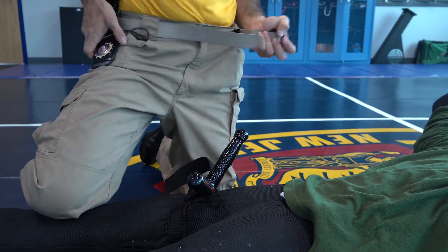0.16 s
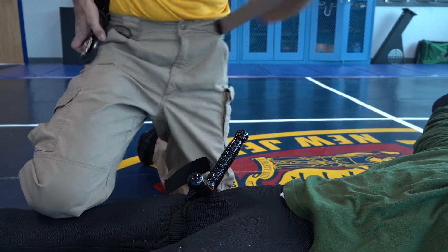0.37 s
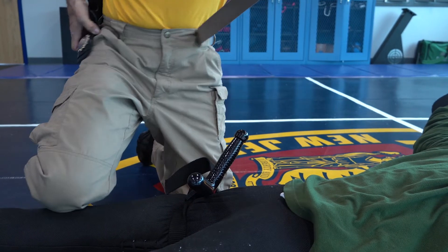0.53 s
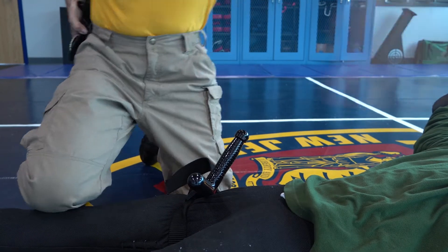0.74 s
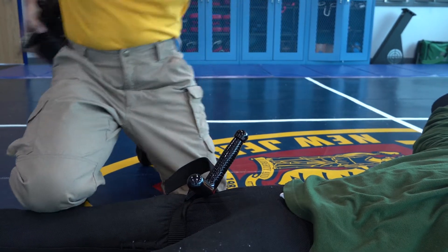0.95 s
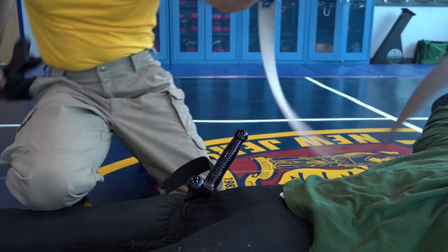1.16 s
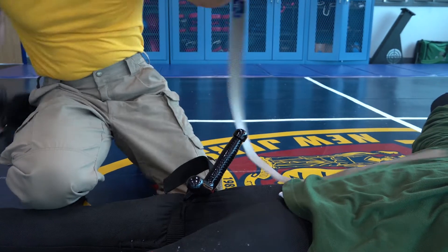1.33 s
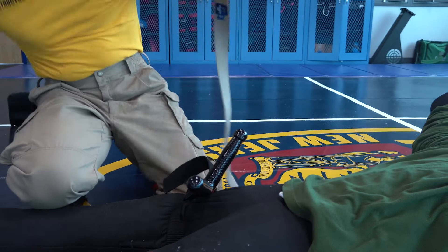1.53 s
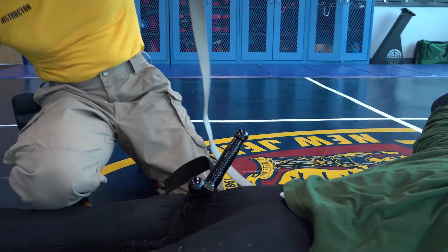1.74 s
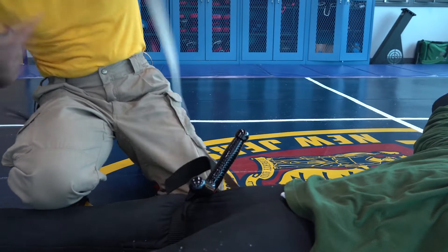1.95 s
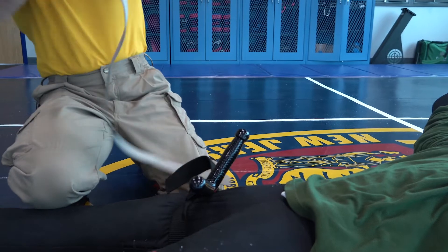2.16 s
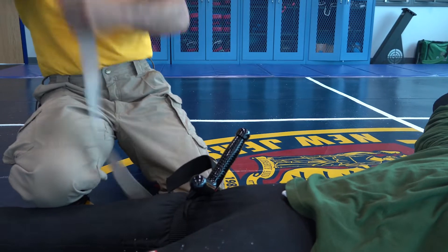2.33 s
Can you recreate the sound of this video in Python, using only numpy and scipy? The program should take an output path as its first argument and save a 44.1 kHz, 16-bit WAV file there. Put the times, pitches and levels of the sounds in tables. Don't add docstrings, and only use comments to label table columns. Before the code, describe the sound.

A webbing belt is pulled fast through trouser loops, a buzzing rising zip ending in a snap, then knee thumps, buckle clatter, a short gritty skid and late clicks, close-miked in a large reverberant hall.

```python
import sys
import numpy as np
from scipy import signal
from scipy.io import wavfile

SR = 44100
rng = np.random.default_rng(int(sys.argv[2]) if len(sys.argv) > 2 else 0)


def amplitude_ratio(level_db):
    exponent = np.asarray(level_db, float) / 20
    return 10 ** exponent


def put_to_file(sound):
    columns = np.atleast_2d(sound).T
    safe = np.clip(columns, -1, 1)
    whole_steps = np.round(safe * 32767)
    wavfile.write(sys.argv[1], SR, whole_steps.astype(np.int16))


N = 105840
GRAINS_PER_S = 1100


def rms_one(x):
    return x / np.sqrt(np.mean(x ** 2) + 1e-20)


def peak_one(x):
    return x / np.max(np.abs(x))


def in_time(rows):
    s, *columns = np.transpose(rows)
    return [np.interp(np.arange(N) / SR, s, column) for column in columns]


def drift(rate_hz):
    r = np.exp(-2 * np.pi * rate_hz / SR)
    wander = signal.lfilter([1], [1, -2 * r, r * r], rng.standard_normal(N + SR))
    return rms_one(wander[SR:])


def ring(x, hz, t60):
    r, w = amplitude_ratio(-60 / (t60 * SR)), 2 * np.pi * hz / SR
    return signal.lfilter([0, np.sin(w)], [1, -2 * r * np.cos(w), r * r], x + 1e-18)


def butter(x, order, hz, kind):
    return signal.sosfilt(signal.butter(order, hz, kind, fs=SR, output="sos"), x)


def colour(x, spectrum, patchy_db):
    out, edges = 0, 20 * 2 ** np.arange(0, 10.1, .5)
    hz, db = np.transpose(spectrum)
    for k, (low, high) in enumerate(zip(edges, edges[1:])):
        band = butter(x[k % 2], 2, [low, high], "band")
        band_db = np.interp(np.log(low * high) / 2, np.log(hz), db)
        out = out + band * amplitude_ratio(band_db + patchy_db * drift(21.0))
    return rms_one(out)


def add(out, s, x):
    i = int(s * SR)
    out[i:i + len(x)] += x[:len(out) - i]


def air():
    # frequency in Hz, level in dB per Hz.
    air_tone = [(24, -22), (45, 10), (68, 0.5), (95, -9.5), (221, -14), (627, -19), (1000, -21),
                (4030, -35.5), (12300, -44), (15000, -65)]
    hum = butter(colour(rng.standard_normal((2, N)), air_tone, patchy_db=3.0), 4, 24.5, "high")
    wobble = butter(rng.standard_normal(N + SR), 3, [5, 10.96], "band")[SR:]
    return amplitude_ratio(-40.5) * hum + amplitude_ratio(-36) * rms_one(wobble)


def hall(x):
    t60, early_db, early_t60, wall_cut_hz = 1.38, 15, 0.15, 2700
    t = np.arange(int(1.5 * SR)) / SR
    noise = rng.standard_normal(len(t))
    low = butter(noise, 1, wall_cut_hz, "low")
    echoes = low + (noise - low) * amplitude_ratio(-40 * t / t60)
    decay = amplitude_ratio(-60 * t / t60) + amplitude_ratio(early_db - 60 * t / early_t60)
    gap = np.clip((t - .008) / 0.015, 0, 1)
    tail = butter(echoes * decay * gap, 2, 250, "high")
    return signal.fftconvolve(x, tail / np.sqrt(np.sum(tail ** 2)))[:N]


def cloth():
    # time in seconds, level in dB.
    movement = [(0, -41), (.06, -50), (.12, -56), (.6, -37.5), (.68, -44.5), (.78, -44.5), (.85, -49.5),
                (1.12, -52), (1.3, -49), (1.36, -46), (1.42, -49.5), (1.47, -42.5), (1.56, -47.5),
                (1.97, -48.5), (2.062, -63), (2.085, -44), (2.31, -45.5), (2.37, -39.5)]
    # frequency in Hz, level in dB per Hz.
    cloth_tone = [(180, 6.5), (300, -16), (431, -48), (620, -20), (720, -74), (1120, 0), (7500, -13),
                  (10600, -10), (15500, -21.5)]
    catches = rng.random((2, N)) < GRAINS_PER_S / SR
    grains = catches * amplitude_ratio(1.9 * rng.exponential(1, (2, N))) * rng.choice([-1, 1], (2, N))
    source = rms_one(grains) + rng.standard_normal((2, N))
    level_db, = in_time(movement)
    return amplitude_ratio(level_db + 2.5 + 1.4 * drift(25.0)) * colour(source, cloth_tone, patchy_db=0.7)


def rustle():
    start_s, rise_s, level_db = 2.32, 0.036, -44
    noise, t = rng.standard_normal(N), np.arange(N) / SR - start_s
    bands = rms_one(ring(noise, 3780, 0.005)) + amplitude_ratio(-7.0) * rms_one(ring(noise, 2600, .003))
    return amplitude_ratio(level_db + 2.7 * drift(30.0)) * np.clip(t / rise_s, 0, 1) * bands


def thumps():
    # start in seconds, peak in dB, floor pitch in Hz.
    landings = [(.002, -29.5, 270), (0.042, -26, 210), (1.123, -28, 219), (1.25, -34, 300),
                (1.317, -16, 166), (1.438, -30.5, 177), (1.584, -24, 208.6), (1.625, -47, 178),
                (1.767, -33.5, 221), (2.339, -21.5, 236.5)]
    out, t, t60 = np.zeros(N), np.arange(SR // 8) / SR, 0.052
    for s, db, hz in landings:
        blow = rng.standard_normal(len(t)) * np.exp(-t / 0.0048)
        add(out, s, amplitude_ratio(db) * peak_one(ring(ring(blow, hz, t60), hz, t60 / 4)))
    return out


def scuffs():
    # start in seconds, peak in dB, length in seconds, ring in Hz.
    rubs = [(.001, -19.5, 0.002, 660), (.009, -20.5, 0.014, 1750), (0.025, -25.5, 0.0076, 1730),
            (.045, -21.5, 0.0061, 1810), (0.144, -26.5, 0.0065, 3100), (0.5595, -19, 0.006, 850),
            (1.054, -33, 0.0075, 1650), (1.082, -29, 0.0099, 1580), (1.12, -26, 0.0099, 1970),
            (1.13, -24, 0.004, 1500), (1.249, -30, 0.016, 1240), (1.315, -20, 0.017, 1200),
            (1.321, -16, .011, 1700), (1.354, -31, 0.0071, 2870), (1.433, -25.5, 0.017, 2370),
            (1.474, -34, 0.013, 2200), (1.58, -20, 0.0038, 540), (1.585, -19.5, 0.011, 1100),
            (1.622, -17.5, 0.0049, 930), (2.16, -25, 0.0032, 2750), (2.17, -30.5, 0.016, 1260)]
    dull_db, edge_db = 1.5, -0.5
    out, t = np.zeros(N), np.arange(SR // 8) / SR
    for s, db, length, hz in rubs:
        rub = rng.standard_normal(len(t)) * np.minimum(t / 0.0013, 1) * np.exp(-(t / length) ** 2)
        body = peak_one(ring(rub, hz, 0.0015)) + amplitude_ratio(dull_db) * peak_one(ring(rub, 685, 0.0035))
        edge = np.diff(signal.lfilter([1], [1, -1.6, .66], rub), prepend=0)
        add(out, s, amplitude_ratio(db) * peak_one(body + amplitude_ratio(edge_db) * peak_one(edge)))
    return out


def creak():
    # time of the slip in seconds, level in dB.
    slips = [(0.709, -25.5), (0.717, -23), (0.729, -22.5), (0.739, -23), (0.749, -22.5), (0.76, -22.5),
             (0.776, -24)]
    # mode in Hz, level in dB, t60 in seconds.
    boot = [(203.1, -5, 0.15), (323, -3, 0.031), (564.5, -6, 0.034), (1000, -6.5, 0.013), (1606, -7, 0.037),
            (2440, -13.5, 0.037), (3470, -14, 0.021)]
    out, t = np.zeros(N), np.arange(SR // 20) / SR
    for hz, mode_db, t60 in boot:
        train = np.zeros(N)
        for s, db in slips:
            train[int(s * SR)] = amplitude_ratio(db + mode_db + rng.normal(0, 1))
        out = ring(train, hz, t60) - out
    puff_db, puff_t60 = 5, 0.018
    for s, db in slips:
        hiss = ring(rng.standard_normal(len(t)), 3000, 0.00037) / 3
        add(out, s, amplitude_ratio(db + puff_db - 60 * t / puff_t60) * hiss)
    return out


def skid():
    # frequency in Hz, level in dB per Hz.
    skid_tone = [(180, 5), (300, 8.5), (490, -16), (943, 7), (3790, -3.5), (5800, 4.5), (9800, -1),
                 (15000, -42)]
    start_s, hold_s, t60, level_db, grit_share = 1.579, .055, 0.46, -28, 0.95
    t = np.arange(N) / SR - start_s
    shape = np.clip(t / .006, 0, 1) * amplitude_ratio(-60 * np.clip(t - hold_s, 0, None) / t60)
    grit = (rng.random((2, N)) < GRAINS_PER_S / SR) * rng.standard_normal((2, N))
    source = rng.standard_normal((2, N)) + grit_share * rms_one(grit)
    return amplitude_ratio(level_db) * shape * colour(source, skid_tone, patchy_db=.8)


def clicks(table):
    ring_t60, crack_t60, upper_db = .008, .004, 2
    out, t = np.zeros(N), np.arange(SR // 20) / SR
    for s, db, low_hz, high_hz, crack_db in table:
        touch = rng.standard_normal(len(t)) * amplitude_ratio(-60 * t / crack_t60)
        lower = peak_one(ring(touch, low_hz, ring_t60))
        upper = peak_one(ring(touch, high_hz, ring_t60 / 2))
        body = signal.lfilter([1, -1], [1, -.96], lower + amplitude_ratio(upper_db) * upper)
        crack = ring(touch, 9430, 0.0013) + 0.5 * ring(touch, 6060, 0.003)
        crack = crack + 0.04 * np.diff(touch, prepend=0)
        add(out, s, amplitude_ratio(db) * peak_one(body) + amplitude_ratio(crack_db) * peak_one(crack))
    return out


def snaps():
    # start in seconds, peak in dB, ring in Hz, t60 in
    # seconds, edge in Hz.
    releases = [(.3383, -1, 560, .011, 15000), (.5605, -17, 1780, .03, 4000), (.5625, -16, 830, .05, 2500),
                (.561, -24, 2650, .025, 6000), (.5925, -18, 720, .025, 2500), (2.1363, -4, 1450, .012, 6000),
                (2.1363, -9, 2500, .006, 8000),
                (0.4331, -6.5, 1130, 0.0087, 2500), (1.252, -32, 390, 0.045, 900),
              (1.322, -22.5, 390, 0.057, 890), (1.5807, -22.5, 113, 0.076, 1480),
              (1.6228, -13.5, 910, 0.016, 3000), (1.6286, -14, 1150, 0.0059, 4000),
              (2.1329, -6, 1760, 0.0028, 6000), (2.1329, -34, 3890, .006, 9100),
              (2.139, -18.5, 560, 0.013, 2000), (2.171, -30, 1270, 0.02, 2520)]
    out, t = np.zeros(N), np.arange(SR // 8) / SR
    for s, db, hz, t60, edge_hz in releases:
        swing = -np.cos(2 * np.pi * hz * t) * amplitude_ratio(-60 * t / t60)
        swing = butter(swing, 2, [hz / 3, min(edge_hz, SR / 3)], "band")
        add(out, s, amplitude_ratio(db) * peak_one(swing))
    return out


def ribs(stroke):
    # time in seconds, overtone gain in dB.
    press = [(.2, -3), (.235, 1.5), (.255, 3), (.27, 4), (.295, 0), (.31, 12), (.322, 5.5), (.337, -9.5),
             (.352, 9.5), (.37, -3), (.39, -3.5), (.41, 1.5), (.44, 6), (.458, 8), (.49, 7), (.512, 0),
             (.54, -7), (.562, -3)]
    # frequency in Hz, level in dB.
    radiation = [(300, -35), (450, -1), (650, 4), (850, -11), (1300, -0.5), (2100, -15.5), (3400, -16.5),
                 (5000, -30), (8000, -40)]
    jitter, scatter, flutter_db, fade_s = .008, .28, 1.0, .007
    (hz, db), (press_db,) = in_time(stroke), in_time(press)
    t, (body_hz, body_db) = np.arange(N) / SR, np.transpose(radiation)
    gate = np.clip(np.minimum(t - stroke[0][0], stroke[-1][0] - t) / fade_s, 0, 1)
    out = 0
    for ratio, loop_db in ((1, 0), (1.2, -11)):
        rib_hz = hz * ratio
        turn = 2 * np.pi * np.cumsum(rib_hz * (1 + jitter * drift(56.4))) / SR
        turn = turn + scatter / 4 * drift(220.0)
        for k in range(1, 8):
            tone_db = np.interp(np.log(k * rib_hz), np.log(body_hz), body_db) + (k > 1) * press_db
            level = amplitude_ratio(loop_db + tone_db + flutter_db * min(k, 3) * drift(40.0))
            out = out + level * np.sin(k * turn + scatter * min(k, 3) * drift(67.0))
    return gate * amplitude_ratio(db - 1) * out, gate * amplitude_ratio(db)


def belt():
    # time in seconds, ribs per second in Hz, level in dB.
    lead = [(.172, 897, -42.5), (.22, 1052, -18.5), (.245, 1373, -43), (.28, 1870, -59)]
    pull = [(0.226, 384.3, -11.5), (0.24, 432.6, -20.5), (0.252, 503.3, -14), (0.262, 567.3, -16.5),
            (0.274, 597, -12), (0.284, 673, -17.5), (0.294, 678, -15), (0.31, 582, -18.5),
            (0.316, 590, -18)]
    jerk = [(0.311, 738.7, -14), (0.321, 779, -14), (0.339, 643, -14), (0.349, 712, -15),
            (0.371, 730, -14.5), (0.388, 620.6, -11.5), (0.411, 820, -17), (0.43, 735, -20),
            (0.448, 830, -18)]
    tail_end = [(0.442, 942, -13), (0.454, 1034, -21.5), (0.476, 1099, -22), (0.488, 994.5, -29),
                (0.496, 1001, -23.5), (0.522, 893, -22), (0.572, 904, -26.5), (0.596, 812, -28),
                (0.6, 814.1, -46)]
    # frequency in Hz, level in dB per Hz.
    swish = [(240, -21.5), (400, -52), (663, -2.5), (928, -16.5), (1400, -18), (1790, -13), (7320, -26.5),
             (9790, -26), (15500, -38)]
    buzz, rub = np.sum([ribs(stroke) for stroke in (lead, pull, jerk, tail_end)], axis=0)
    keep = np.exp(-1 / (.02 * SR))
    rub = (rub + signal.lfilter([1 - keep], [1, -keep], rub)) / 2
    return buzz + amplitude_ratio(-8) * rub * colour(rng.standard_normal((2, N)), swish, patchy_db=2.5)


def scene():
    # start in seconds, ring in dB, lower and upper ring in Hz, crack in dB.
    buckle = [(.147, -22.5, 1220, 2160, -29), (.3377, -14, 2000, 3200, -6), (.433, -30, 1130, 1400, -42),
              (.592, -20, 754.5, 1614, -17.5), (1.194, -29.5, 1540, 3220, -37),
              (1.561, -25, 1640, 680, -52), (1.5765, -19.5, 880, 3930, -8.5), (1.5845, -15, 710, 2580, -6),
              (1.586, -12.5, 1200, 3970, -4), (1.6095, -41, 1220, 3500, -10),
              (1.6125, -35, 1200, 3500, -21), (1.6265, -14.5, 1470, 3860, -8),
              (2.077, -19, 1090, 2530, -51), (2.112, -22, 2240, 3300, -52), (2.1322, -13, 3800, 1960, -22),
              (2.1358, -28, 3400, 5660, -22.5), (2.15, -16.5, 1250, 3300, -34),
              (2.279, -20.5, 3230, 1650, -29)]
    ticks = [(.5605, -17, 1833, 2550, -41), (.567, -25, 850, 2660, -29), (1.5955, -42, 5500, 3000, -22),
             (1.601, -33, 5600, 2010, -28), (1.6175, -16, 5450, 7500, -32), (1.6235, -18, 2500, 5000, -20),
             (1.638, -23, 2970, 4020, -27), (1.651, -34, 1000, 7000, -22), (1.667, -21, 1960, 1210, -39),
             (1.765, -26.5, 2600, 4520, -36), (2.147, -20, 1230, 4650, -50), (2.1615, -27, 1500, 2700, -40),
             (2.25, -32, 1500, 2980, -29), (.565, -25, 2660, 1820, -36), (.571, -24, 900, 2690, -49)]
    hits = clicks(buckle) + scuffs() + thumps() + creak() + snaps()
    near = belt() + skid()
    walls = amplitude_ratio(-22) * hall(near + amplitude_ratio(10.0) * hits)
    return (near + hits + cloth() + walls + air() + clicks(ticks) + rustle())[None]


def low_pass(x):
    return signal.sosfilt(signal.butter(12, 15760, fs=SR, output="sos"), x)


def record(dry):
    soft = butter(dry, 5, 13500, "low")
    return low_pass(np.clip(soft, -1, 1))


dry = scene()
out = record(dry)
put_to_file(out)
```